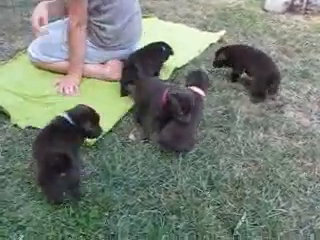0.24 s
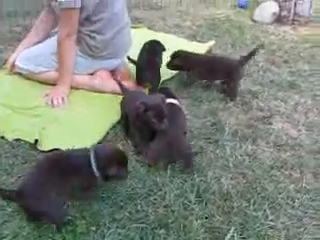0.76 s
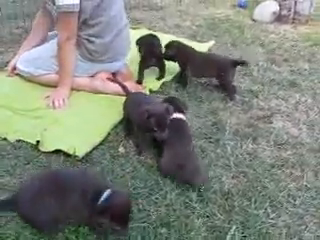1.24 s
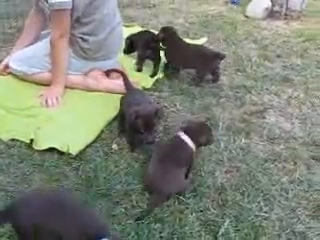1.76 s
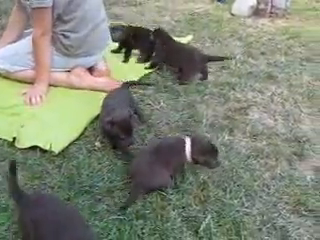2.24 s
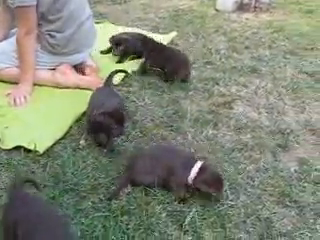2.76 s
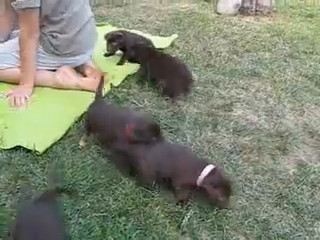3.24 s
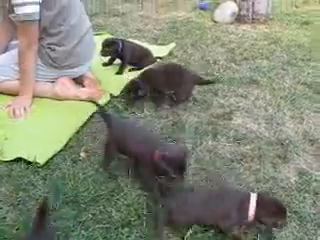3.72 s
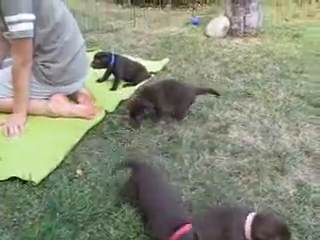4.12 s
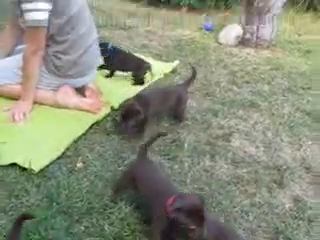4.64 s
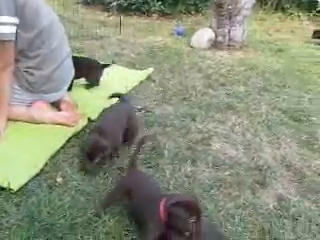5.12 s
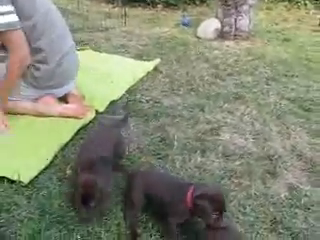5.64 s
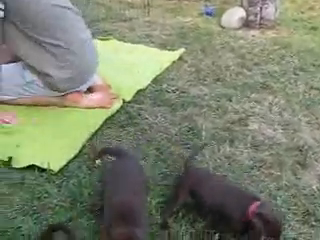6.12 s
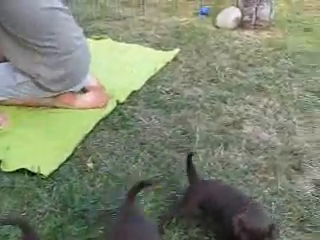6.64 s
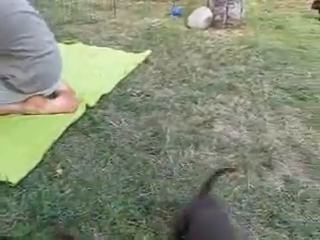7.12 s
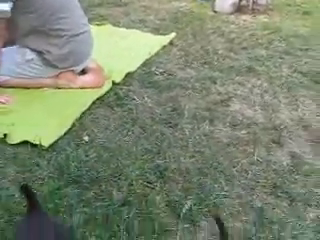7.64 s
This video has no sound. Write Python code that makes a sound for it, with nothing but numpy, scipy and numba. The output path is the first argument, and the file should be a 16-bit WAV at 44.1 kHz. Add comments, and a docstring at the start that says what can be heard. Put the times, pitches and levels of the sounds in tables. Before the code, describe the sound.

Playful puppy growls, thin wavering whines, sniffs and little knocks over rustling lawn, then close blustery snuffling thuds into the microphone.

```python
"""A lawn where puppies play: rough fluttering growls, with thin whines and a yelp.
Growls are uneven pulses through throat resonances; whines are a few wavering partials; sniffs are rasping air.
Paws rustle the grass as grainy noise; jaws, paws and collars thump and click as short rings.
A gust or close snuffling rumbles on the microphone ports as lumpy low noise.
Broad outdoor noise and a faint high tone, a very narrow band of noise, lie below."""
import sys
import numpy as np
from scipy import signal
from scipy.io import wavfile
from scipy.ndimage import uniform_filter1d
from numba import njit

SR = 44100
rng = np.random.default_rng(int(sys.argv[2]) if len(sys.argv) > 2 else 0)


def store_wav(level_fs):
    """Save 16-bit WAV to argv[1]."""
    pcm = np.round(np.clip(np.atleast_2d(level_fs), -1, 1) * 32767)
    wavfile.write(sys.argv[1], SR, pcm.T.astype(np.int16))


N = 347067


def from_db(db):
    """Decibels to gain."""
    return 10 ** (np.asarray(db) / 20)


def rms_one(x):
    """Scale to rms 1."""
    return x / np.sqrt(np.mean(x ** 2) + 1e-20)


def evened(x, seconds):
    """Hold the level steady over a short stretch, so that the level curves alone set it."""
    return x / np.sqrt(uniform_filter1d(x ** 2, int(seconds * SR)) + 1e-12)


def in_time(rows):
    """The samples that a table covers, and its columns drawn as lines along them."""
    s, *columns = np.transpose(rows)
    at = np.arange(max(int(s[0] * SR), 0), min(int(s[-1] * SR), N))
    return at, [np.interp(at / SR, s, c) for c in columns]


def at_hz(points, hz):
    """Read a spectrum on a log frequency axis."""
    point_hz, value = np.transpose(points)
    return np.interp(np.log(hz), np.log(point_hz), value)


def pan(x, db):
    """Place a sound by its left-right level difference; positive is louder on the left."""
    return x * from_db(np.array([db / 2, -db / 2]).reshape(2, -1))


def fade(size):
    """Five milliseconds of ramp at both ends."""
    k = np.arange(size)
    return np.clip(np.minimum(k, size - k) / (SR / 200), 0, 1)


def drift(rate, size=N):
    """Smooth random wandering of spread 1, faster at a higher rate; drawn every 40 samples."""
    r = np.exp(-80 * np.pi * rate / SR)
    noise = rng.standard_normal(size // 40 + 2002)
    slow = signal.lfilter([1], [1, -2 * r, r * r], noise)[2000:]   # skip the settling
    spread = np.sqrt((1 + r * r) / (1 - r * r) ** 3)
    return np.interp(np.arange(size) / 40, np.arange(len(slow)), slow / spread)


def resonate(x, modes):
    """Parallel resonances with alternating signs, each (centre [Hz], width [Hz], level [dB])."""
    out = 0
    for k, (hz, width, db) in enumerate(modes):
        r = np.exp(-np.pi * width / SR)
        ringing = signal.lfilter([1 - r * r, 0, r * r - 1], [1, -2 * r * np.cos(2 * np.pi * hz / SR), r * r], x)
        out = out + (-1) ** k * from_db(db) * ringing
    return out


@njit
def gliding(x, hz, r, step):
    """One resonance whose centre moves."""
    y = np.zeros(len(x))
    for i in range(2, len(x)):
        y[i] = (1 - r * r) * (x[i] - x[i - 2]) + 2 * r * np.cos(step * hz[i]) * y[i - 1] - r * r * y[i - 2]
    return y


def glide(x, hz, width):
    """A moving resonance of a given width in Hz."""
    return gliding(x, hz, np.exp(-np.pi * width / SR), 2 * np.pi / SR)


def banded_noise(spectrum, shared_db, own_db, rate, alike_share, grains=1):
    """Half-octave bands of stereo noise, each with its level, flicker and left-right likeness; rms 1."""
    # how alike left and right are: (frequency [Hz], likeness [0 to 1])
    likeness = [(60, 0.55), (130, 0.91), (280, 0.83), (590, 0.56), (1260, 0.4), (2710, 0.32), (5800, 1.0),
                (12400, 1)]
    out, together = 0, drift(rate)
    edges = 22 * 2 ** np.arange(0, 9.6, .5)
    white = rng.standard_normal((2, 2, N)) * grains
    for k, (low, high) in enumerate(zip(edges, edges[1:])):
        hz = np.sqrt(low * high)
        if not spectrum[0][0] < hz < min(spectrum[-1][0] * 1.2, 14000):
            continue
        band = signal.butter(2, [low, high], "band", fs=SR, output="sos")
        mid, side = signal.sosfilt(band, white[k % 2])   # neighbouring bands use separate noise
        alike = np.clip(alike_share * at_hz(likeness, hz), -1, 1)
        gain = from_db(at_hz(spectrum, hz) + shared_db * together + own_db * drift(rate))
        out = out + gain * (np.sqrt(1 + alike) * mid + np.sqrt(1 - alike) * side * [[1], [-1]])
    return rms_one(out)


def bursts(s, length, db, side_db):
    """Stereo power of swells that climb to a peak and sink again; overlapping powers add."""
    rise_db, fall_db = 27.5, 24.5   # climb and fall over one length
    power = np.zeros((2, N))
    for peak, span, top, side in np.broadcast(s, length, db, side_db):
        at = np.arange(max(int((peak - 2 * span) * SR), 0), min(int((peak + 2 * span) * SR), N))
        late = (at / SR - peak) / span
        swell_db = top + np.minimum(rise_db * late, -fall_db * late)
        power[:, at] += pan(from_db(swell_db), side) ** 2
    return power


def growls(uneven_db=2.5):
    """Uneven fold pulses, bunched by a slower flap, ring chest and mouth; breath hisses with each pulse."""
    # each growl's course: (time [s], fold pitch [Hz], chest level [dB], open mouth level [dB])
    growl_curves = [
        [(0.44, 191.9, -42, -51), (0.458, 191.4, -43, -54), (0.512, 214.6, -41.5, -51),
         (0.608, 202.5, -45.5, -53.5), (0.676, 200.6, -46, -54), (0.724, 140, -44.5, -50),
         (0.85, 133, -49.5, -60)],
        [(1.28, 202, -63, -62), (1.326, 201, -56, -69), (1.374, 244.4, -47, -67), (1.42, 244, -67, -67)],
        [(2.04, 211.8, -56, -56), (2.102, 189.2, -48, -60), (2.118, 187, -57, -61), (2.164, 137.3, -44.5, -55),
         (2.24, 138, -64, -68)],
        [(3.41, 184.5, -74, -72), (3.436, 192.9, -40.5, -65), (3.458, 195.4, -40, -60),
         (3.55, 196.8, -33.5, -42.5), (3.588, 199.7, -33.5, -47), (3.656, 204.4, -35, -41),
         (3.728, 197.5, -45.5, -49), (3.8, 202.7, -69, -52.5)],
        [(4.07, 216.8, -70, -52), (4.102, 213, -30, -52), (4.14, 198.7, -41.5, -56), (4.21, 194, -63, -76)],
        [(4.368, 134.6, -39.5, -42), (4.472, 138.6, -40.5, -51), (4.518, 167.6, -46, -58),
         (4.576, 195, -45, -47.5), (4.616, 169.4, -56, -50), (4.688, 178.4, -52, -48), (4.71, 177, -72, -65)],
        [(4.88, 195, -51, -55.5), (4.946, 197.9, -40, -40.5), (4.998, 147.3, -47.5, -48.5),
         (5.036, 150.3, -43.5, -43.5), (5.088, 217, -47, -52.5), (5.118, 238.5, -48, -51.5),
         (5.16, 213, -47.5, -67)],
        [(5.38, 140.2, -54, -59), (5.432, 145.4, -38.5, -47), (5.51, 143.6, -44.5, -53), (5.552, 137, -50, -59),
         (5.592, 144.7, -51.5, -53), (5.62, 143, -70, -71)],
        [(5.88, 153, -60, -71), (5.92, 151.9, -45.5, -50), (5.984, 142.9, -39.5, -47),
         (6.022, 163.4, -34.5, -44), (6.056, 196, -32, -37), (6.108, 198.3, -34, -35.5),
         (6.18, 195, -31, -43.5), (6.25, 153.5, -59, -64)],
        [(6.74, 146.3, -58, -61), (6.78, 140.1, -45.5, -56), (6.844, 137.4, -45.5, -50.5),
         (6.886, 137.1, -44.5, -51.5), (6.986, 138.8, -46, -56), (7.02, 137, -51, -69)],
        [(7.42, 198.6, -67, -68), (7.45, 205.4, -32.5, -48), (7.485, 221.6, -32, -49),
         (7.507, 223.2, -28, -40.5), (7.568, 219.7, -37.5, -53), (7.62, 200, -52, -59)],
        [(7.628, 160.4, -37, -50), (7.636, 167.3, -31, -31), (7.669, 211.4, -32.5, -39.5),
         (7.711, 214.6, -30, -35.5), (7.797, 178.2, -42.5, -46.5), (7.83, 170, -58, -73)],
    ]
    # roughness: (flaps of loose tissue [per s], flap depth [dB], strong-weak pulse step [dB],
    # pitch jitter [share], air [share])
    flutter = [(47, 12, 2, .15, .3), (60, 4, 2, .06, .2), (60, 8, 2, .2, .4), (80, 4, 5, .06, .25),
               (60, 2, 2, .06, .2), (50, 2, 1, .09, .4), (34, 11, 2, .12, .3), (24, 12, 2, .1, .2),
               (26, 4, 5, .07, .3), (60, 8, 2, .16, .45), (40, 2, 7, .06, .35), (30, 5, 6, .08, .35)]
    # throat: (deep chest [dB], upper chest [dB], mouth resonance at start [Hz], at end [Hz],
    # breath against the mouth [dB], left-right difference [dB])
    throats = [(5, -8, 1560, 1500, -13, 0), (-4, -12, 1200, 1500, 1, -1), (5, -7, 1730, 1700, -5, 0),
               (-3, -13, 1820, 1160, -33, 1), (-2.5, -1.5, 2160, 1700, -16, 0.5),
               (2, 3, 1680, 1100, -22, -0.5), (0.5, -4, 1740, 1700, -18, 0), (-1, -3, 1670, 1720, -7.5, 1),
               (-5, -13, 1710, 1570, -16, 0.5), (-3.5, -9, 1560, 1540, -11, 0.5),
               (-11, 1.5, 1550, 1200, -9.5, 0), (-17, -7, 1510, 1440, -23, 0)]
    # chest resonances: (centre [Hz], width [Hz], level [dB])
    chest_modes = [(122, 26.4, 5), (219, 98.5, 1), (295, 83.3, 2), (737, 274, -6)]
    # mouth resonances: (centre [share of the moving mouth resonance], width [Hz], level [dB])
    mouth_modes = [(.85, 254, 4), (1.12, 265, 4), (1.45, 450, -0.5)]
    # breath resonances: (centre [Hz], width [Hz], level [dB])
    breath_modes = [(3170, 560, -9), (3880, 290, 4), (4670, 550, 10), (6960, 2400, -25)]
    dull = signal.butter(2, 900, fs=SR, output="sos")
    out = np.zeros((2, N))
    for rows, (flaps, depth_db, step_db, jitter, noisy), throat in zip(growl_curves, flutter, throats):
        deep_db, upper_db, from_hz, to_hz, breath_db, side_db = throat
        at, (hz, chest_db, mouth_db) = in_time(rows)
        size = len(at)
        mouth_hz = np.linspace(from_hz, to_hz, size)

        cycles = np.cumsum(hz * np.exp(jitter * drift(60, size=size))) / SR
        flap_rate = flaps * np.exp(0.16 * drift(27.5, size=size))
        flap = np.cos(2 * np.pi * np.cumsum(flap_rate) / SR)
        # every second pulse is weaker by a wandering amount, which adds lines at half the pitch
        alternate = np.floor(cycles) % 2 * np.clip(1 + drift(15.0, size=size), 0, 2)
        pulse_db = depth_db * flap / 2 - step_db * alternate + uneven_db * rng.standard_normal(size)
        pulses = rms_one(np.diff(np.floor(cycles), prepend=0) * from_db(pulse_db))
        opening = signal.lfilter([.008], [1, -.992], pulses)
        puffs = rms_one(opening * rng.standard_normal(size))   # air follows each opening
        source = pulses + noisy * puffs

        modes = np.array(chest_modes) + np.outer([deep_db, 0, 0, upper_db], [0, 0, 1])
        soft = signal.sosfilt(dull, source)   # the closed mouth dulls the chest sound
        chest = evened(resonate(resonate(soft, [(245, 555, 0)]), modes), 0.085)

        shaped = glide(source + 2 * noisy * puffs, mouth_hz, 810)
        mouth = sum((-1) ** k * from_db(db) * glide(shaped, share * mouth_hz, width)
                    for k, (share, width, db) in enumerate(mouth_modes))
        mouth = evened(mouth, 0.068)
        breath = rms_one(resonate(0.21 * pulses + puffs, breath_modes))

        voice = from_db(chest_db) * chest + from_db(mouth_db) * (mouth + from_db(breath_db) * breath)
        out[:, at] += pan(voice * fade(size), side_db)
    return out


def whines(waver=.007):
    """Taut folds give a few clean partials that waver a little."""
    # whines, a squeak and a yelp: (time [s], pitch [Hz], fundamental [dB], overtones [dB])
    whine_curves = [
        [(0.125, 984, -62, -66), (0.135, 973, -51, -49.5), (0.183, 1091, -44, -57), (0.245, 977, -50, -42.5),
         (0.295, 1025, -48.5, -44), (0.325, 943, -45, -35.5), (0.349, 800, -42, -41), (0.37, 810, -47, -80)],
        [(0.64, 795, -40, -72), (0.67, 947, -53, -50), (0.7, 1025, -38.5, -50), (0.738, 871, -46, -45.5),
         (0.778, 818, -37, -43.5), (0.818, 853, -41.5, -44.5), (0.865, 773, -40, -49)],
        [(1.155, 735, -48, -42), (1.165, 730, -43.5, -46), (1.247, 707, -35, -43.5), (1.32, 663, -43.5, -42),
         (1.37, 656, -38.5, -40.5), (1.392, 681, -45, -40.5), (1.451, 690, -54, -50), (1.479, 623, -28.5, -43),
         (1.491, 690, -33, -40), (1.507, 740, -43, -61), (1.53, 719, -68, -75)],
        [(1.842, 528, -45, -51.5), (1.906, 641, -39.5, -50.5), (1.962, 595, -36, -46.5), (1.976, 569, -38, -45),
         (1.985, 474, -37.5, -44), (1.996, 494, -30, -48), (2.006, 695, -30.5, -60), (2.028, 670, -45, -66)],
        [(4.314, 1900, -44, -80), (4.335, 2360, -39, -72)],
        [(4.328, 1110, -35, -70), (4.337, 1500, -36, -55), (4.345, 1680, -31, -45), (4.352, 1738, -26, -40),
         (4.36, 1640, -30.5, -45), (4.371, 1380, -37, -58)],
    ]
    # voice of each: (left-right difference [dB], throb [dB],
    # then 2nd to 6th partial against the overtones [dB])
    voices = [(2.5, 2, -0.5, -27.5, -20, -12, -20), (2, 2, -1, -14.5, -18, -5, -12),
              (2.5, 1.8, -1.5, -11.5, -24, -30, -30), (2, 2.8, -2.5, -0.5, -16, -19, -25),
              (1, 1, 0, 0, -30, -30, -30), (1, 1, -16, -0.5, -30, -30, -30)]
    nose_hz, nose_fall_db_per_khz = 5540, 12   # partials above 3 kHz only pass near this resonance
    hoarse_s, hoarse_under_hz = .004, 1100   # low whines waver more, the faster their pitch slides
    out = np.zeros((2, N))
    for rows, (side_db, throb_db, *partials) in zip(whine_curves, voices):
        at, (hz, first_db, over_db) = in_time(rows)
        size = len(at)
        slide = uniform_filter1d(np.abs(np.gradient(np.log(hz))) * SR, size=SR // 50)
        hoarse = hoarse_s * (hz < hoarse_under_hz) * slide
        wander = waver * drift(62, size=size) + hoarse * drift(150, size=size)
        phase = 2 * np.pi * np.cumsum(hz * (1 + wander)) / SR
        tone = 0
        for k, db in enumerate([first_db] + [over_db + p for p in partials], start=1):
            off_nose_khz = np.abs(k * hz - nose_hz) / 1000 * (k * hz > 3000)
            partial_db = db - nose_fall_db_per_khz * off_nose_khz + throb_db * drift(41, size=size)
            tone = tone + from_db(partial_db) * np.sin(k * phase)
        out[:, at] += pan(np.sqrt(2) * tone * fade(size), np.array(side_db))
    return out


def sniffs(rasp_db=3.0):
    """Rasping air passes twice through each of two moving nose resonances."""
    # sniffs and huffs through the nose: (start [s], length [s], resonance from [Hz], to [Hz],
    # width [Hz], level [dB])
    sniff_list = [(3.524, 0.072, 3080, 2400, 1500, -46), (4.077, 0.054, 2300, 2200, 700, -51),
                  (4.385, 0.137, 4980, 4420, 500, -49), (4.535, 0.048, 4870, 5000, 800, -45.5),
                  (4.597, .11, 2690, 2600, 900, -53), (4.901, 0.12, 4930, 4700, 600, -52),
                  (6.58, 0.046, 3970, 4100, 500, -52.5), (6.954, 0.058, 5100, 4970, 400, -47),
                  (7.085, 0.064, 5170, 5000, 400, -50), (7.166, 0.05, 4340, 4100, 600, -54.5),
                  (7.46, 0.11, 4600, 4900, 600, -59), (7.585, 0.053, 4900, 4900, 500, -52),
                  (7.633, 0.16, 4840, 4970, 600, -49)]
    edge_s = 0.011
    lower_share, lower_db = 0.85, -5.5   # the second resonance lies below the first
    out = np.zeros(N)
    for s, length, from_hz, to_hz, width, level_db in sniff_list:
        at, (hz,) = in_time([(s, from_hz), (s + length, to_hz)])
        air = rng.standard_normal(len(at)) * from_db(rasp_db * drift(100, size=len(at)))
        k = np.arange(len(at))
        swell = np.clip(np.minimum(k, len(at) - k) / (edge_s * SR), 0, 1)
        nose = sum(gain * glide(glide(air, f, width), f, width)
                   for f, gain in [(hz, 1), (lower_share * hz, from_db(lower_db))])
        out[at] += from_db(level_db) * rms_one(nose) * swell
    return out


def knocks(under=0.615, push_hz=110):
    """Each thump or tick rings briefly at two pitches, with a dying noise burst and a low push."""
    # jaw snaps and paw thumps: (time [s], level [dB], pitch [Hz], decay by 60 dB [s],
    # left-right difference [dB], low push against the level [dB])
    thumps = [(0.861, -23.5, 1107, 0.045, 10, -26), (2.441, -39.5, 560, 0.13, 0, -9),
              (2.689, -39.5, 750, 0.036, 3, -7), (3.104, -38, 580, 0.044, 0.0, -9),
              (3.341, -32.5, 620, 0.03, 4, -21), (3.711, -26, 800, 0.029, -8, 1.5),
              (3.951, -24, 643, 0.062, -4, -22), (3.998, -20, 674, 0.028, 8, -27),
              (4.255, -28.5, 630, 0.01, -6, -18), (4.53, -30.5, 1130, 0.054, -14, -8),
              (4.574, -24.5, 399, 0.077, 3, -18), (4.78, -35, 482, 0.089, 1, -18),
              (5.285, -38.5, 850, 0.069, 0.0, -11), (5.758, -31.5, 306, 0.051, 0.0, -9),
              (7.209, -34, 406, 0.05, -1, 6), (7.374, -23.5, 1117, 0.058, 10.5, -22),
              (7.502, -18.5, 332, 0.024, -2, -7), (7.633, -26, 1456, 0.087, 5, -12)]
    # dry ticks: (time [s], level [dB], pitch [Hz], left-right difference [dB])
    tick_list = [(0.371, -32, 9550, -1), (0.421, -31, 8000, -1), (0.444, -26, 8900, 7),
                 (0.4903, -30, 7500, 18), (0.5407, -26, 10000, 8), (0.5521, -19.5, 8950, -2),
                 (0.5764, -22, 9200, 0.0), (0.585, -22, 10000, 3), (0.61, -30, 9000, 0),
                 (0.69, -38, 9000, 0), (1.542, -35, 4730, -2), (1.671, -35, 7730, 2), (3.257, -31, 7880, 2),
                 (5.6725, -34, 4300, -2), (2.3494, -36, 4000, -2), (3.233, -18.5, 10750, 2),
                 (3.713, -28, 1700, -3), (3.9634, -20, 2770, -17), (3.999, -23, 2830, 0.0),
                 (4.531, -24, 4000, -8), (4.7147, -18, 3240, -15), (5.2862, -21, 6040, -3),
                 (7.634, -36, 4580, -24)]
    high_ring = 0.37   # knocks from 2.5 kHz up ring less
    out, t = np.zeros((2, N + SR)), np.arange(SR // 8) / SR
    ticks = [(s, db, hz, .012, side, -40) for s, db, hz, side in tick_list]
    for s, db, hz, t60, side_db, push_db in list(thumps) + ticks:
        start = int((s + 0.00098) * SR)
        decay = from_db(-60 * t / max(t60, .004))
        band = [(hz, (.6 if hz < 2500 else 1.6) * hz, 0)]
        burst = resonate(resonate(rng.standard_normal(len(t)) * decay ** 2, band), band)
        ring = 0.53 * np.sin(2 * np.pi * hz * t) + 0.34 * np.sin(2 * np.pi * under * hz * t) * decay
        ring = ring * (1 if hz < 2500 else high_ring)
        push = from_db(push_db) * np.sin(2 * np.pi * push_hz * t)
        soft = 1 - np.exp(-t * hz * 2)   # the contact builds up over about half a cycle
        shape = soft * (ring + push) * decay + 0.54 * burst / np.abs(burst).max()
        out[:, start:start + len(t)] += pan(from_db(db) * shape, side_db)
    return out[:, :N]


def echoes(x):
    """A few dulled, delayed returns; every second one is inverted on the right."""
    # returns from ground, fence and wall: (delay [s], level [dB])
    returns = [(.011, -18.5), (.023, -35), (.037, -17), (.056, -32)]
    dull, out = signal.lfilter([.3], [1, -.7], x), x.copy()
    for k, (delay, db) in enumerate(returns):
        lag = int(delay * SR)
        out[:, lag:] += from_db(db) * dull[:, :-lag] * [[1], [(-1) ** k]]
    return out


def grass():
    """Blades snap and rub under the paws: noise thick with small grains, in a high and a lower layer."""
    # paws through grass: (peak time [s], length [s], rustle level [dB], lower scuffle level [dB])
    steps = [(0.0, 0.024, -60, -51), (0.127, 0.16, -71, -55), (0.28, 0.35, -54, -61),
             (0.436, 0.097, -45.5, -53), (0.5, .06, -44, -50), (0.543, 0.12, -44, -54),
             (0.705, 0.45, -51.5, -54), (0.899, 0.096, -44, -66), (1.003, 0.13, -49.5, -52.5),
             (1.383, 0.27, -51.5, -56), (1.702, 0.092, -52, -52.5), (2.17, 0.065, -49.5, -51),
             (2.334, 0.38, -49, -54.5), (2.657, 0.17, -55.5, -63), (3, 0.096, -52, -43),
             (3.06, .1, -49, -53), (3.237, 0.15, -50, -55), (3.31, 0.082, -45, -50.5),
             (3.453, .15, -49, -53), (3.56, 0.19, -54, -43), (3.697, 0.32, -56, -46),
             (3.983, 0.1, -49, -40.5), (4.12, 0.086, -55, -43), (4.179, 0.17, -49, -48),
             (4.35, .08, -65, -45), (4.387, 0.11, -46, -60), (4.561, 0.2, -54, -41.5),
             (4.754, 0.22, -80, -46), (5.013, 0.2, -50.5, -41.5), (5.14, 0.14, -55, -54.5),
             (5.281, 0.11, -53, -48), (5.399, 0.14, -47, -54), (5.477, 0.11, -49, -48.5),
             (5.747, .25, -52.5, -49), (5.953, 0.18, -54, -48.5), (6.065, 0.11, -55, -43.5),
             (6.121, 0.12, -54, -37.5), (6.182, 0.15, -43.5, -39.5), (6.4, 0.35, -57, -54),
             (6.62, 0.045, -50, -54), (6.73, 0.12, -53, -50), (6.9, 0.22, -51, -51), (7.13, .15, -63, -48),
             (7.3, 0.48, -58, -54.5), (7.49, 0.13, -56, -45), (7.67, 0.52, -73, -44)]
    # spectrum of the rustle: (frequency [Hz], relative level per Hz [dB])
    rustle_spectrum = [(1500, -44), (3500, 2.5), (6000, 2), (9000, 2), (12500, 3)]
    # spectrum of the scuffle: (frequency [Hz], relative level per Hz [dB])
    scuffle_spectrum = [(300, 5.5), (1000, 7.5), (2500, 4), (5000, 1), (7000, -6.5), (12000, -55)]
    lawn_rustle_db, lawn_scuffle_db = -60, -58.5   # the stir between steps
    s, length, rustle_db, scuffle_db = np.transpose(steps)
    grains = from_db(4.0 * np.minimum(rng.exponential(1, N), 6))
    rustle = np.sqrt(from_db(2 * lawn_rustle_db) + bursts(s, length, rustle_db, 0))
    scuffle = np.sqrt(from_db(2 * lawn_scuffle_db) + bursts(s, length, scuffle_db, 0))
    return (rustle * banded_noise(rustle_spectrum, 1.64, 1.25, 50, 1.0, grains)
            + scuffle * banded_noise(scuffle_spectrum, 2.2, 1.7, 23.6, 1.0, grains))


def wind():
    """Lumpy turbulence, its own at each port; snuffling adds a higher flutter."""
    # breeze on the ports: (time [s], rumble level [dB], left-right difference [dB])
    breeze_curve = [(0, -55.5, -5), (0.6, -63, 0), (1.3, -53, -3), (1.5, -60.5, 3), (2.7, -58, 3),
                    (3.4, -58, 4), (4.4, -61, 3), (5.0, -52, 2), (5.7, -54, -2), (6.3, -52.5, -9),
                    (6.45, -43, -8.5), (6.701, -29.5, 0), (7.1, -29.5, -5), (7.5, -25, -15.5),
                    (7.7, -39, 0), (7.87, -41, -5)]
    # puffs of air at the ports, the late ones from a snout close by: (peak time [s], length [s],
    # rumble level [dB], higher snuffle level [dB], left-right difference [dB])
    air_puffs = [(0.475, .1, -57, -80, -3), (2.933, 0.066, -52, -80, 12), (3.716, 0.033, -37, -80, 11),
                 (4.15, 0.062, -46.5, -80, -13), (4.237, 0.049, -46, -80, -7), (4.536, 0.056, -42, -80, 5),
                 (5.05, 0.11, -44.5, -80, -16), (5.12, .1, -45.5, -80, -14), (5.78, .1, -50, -80, -12),
                 (5.98, .1, -50, -80, 2), (6.537, 0.033, -33, -59, 12), (6.614, 0.07, -24.5, -54, -13),
                 (6.703, 0.04, -24, -33.5, -12), (6.801, 0.16, -17, -36, 0.5), (6.89, 0.08, -18.5, -29, 8),
                 (7.018, 0.043, -19, -47, 5), (7.06, 0.13, -21.5, -51, 8.5), (7.229, 0.029, -14, -26, -8.5),
                 (7.37, 0.16, -19, -25.5, -6.5), (7.458, 0.069, -18, -22, -6),
                 (7.511, 0.056, -30, -19, -15), (7.583, 0.14, -28, -23, 4.5),
                 (7.653, 0.13, -25.5, -32, -15), (7.792, .05, -29, -44, 10), (7.865, 0.05, -31, -44, -11)]
    # spectrum of the rumble: (frequency [Hz], relative level per Hz [dB])
    rumble_spectrum = [(18, -8), (30, 7), (50, 3), (90, 0), (140, -17), (200, -51), (300, -41), (700, -63)]
    # spectrum of the snuffle: (frequency [Hz], relative level per Hz [dB])
    snuffle_spectrum = [(60, -6), (110, 11), (220, -2), (330, -34), (600, -44)]
    t, (s, level_db, side_db) = np.arange(N) / SR, np.transpose(breeze_curve)
    breeze = pan(from_db(np.interp(t, s, level_db)), np.interp(t, s, side_db))
    s, length, rumble_db, snuffle_db, side_db = np.transpose(air_puffs)
    rumble = np.sqrt(breeze ** 2 + bursts(s, length, rumble_db, side_db))
    snuffle = np.sqrt(bursts(s, length, snuffle_db, side_db))
    return (rumble * evened(banded_noise(rumble_spectrum, 0.76, 0.8, 14, 0), 0.16)
            + snuffle * banded_noise(snuffle_spectrum, 2.7, 1.4, 18.4, 0.55))


def garden():
    """Broad outdoor noise, strongest in the lows, whose bands flicker slightly."""
    # spectrum: (frequency [Hz], relative level per Hz [dB])
    garden_spectrum = [(35, -28), (60, -5), (123, 3.5), (175, -0.5), (256, 3), (350, -3.5), (783, -4.5),
                       (896, -8.5), (1120, -6), (1670, -10), (8000, -15), (11400, -20), (12500, -51),
                       (16200, -71), (22000, -120)]
    return from_db(-51.5) * banded_noise(garden_spectrum, 1.0, 1.0, 7.0, 1.0)


def high_tone():
    """Noise through one very narrow resonance sounds as a faint, unsteady tone."""
    # the resonance: (centre [Hz], width [Hz], level [dB])
    tone_band = (7866, 45, -70)
    hz, width, level_db = tone_band
    return from_db(level_db) * rms_one(resonate(rng.standard_normal(N), [(hz, width, 0)]))


def scene():
    """Puppies with their echoes, then lawn, air and background."""
    puppies = growls() + whines() + sniffs() + knocks()
    return echoes(puppies) + grass() + wind() + garden() + high_tone()


def record(dry):
    """A late copy of the middle range, opposite in left and right, widens the sound; the top is cut steeply."""
    # band of the late copy: (centre [Hz], width [Hz], level [dB])
    middle_spread = (1530, 830, -21.5)
    lag_s, cutoff_hz = .004, 12600   # the cut reaches 60 dB at the cutoff
    late_middle = np.roll(resonate(dry.mean(axis=0), [middle_spread]), int(lag_s * SR))
    widened = dry + late_middle * [[1], [-1]]
    return signal.sosfilt(signal.cheby2(16, 60, cutoff_hz, fs=SR, output="sos"), widened)


dry = scene()
out = record(dry)
store_wav(out)
```